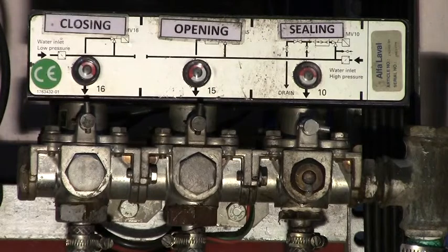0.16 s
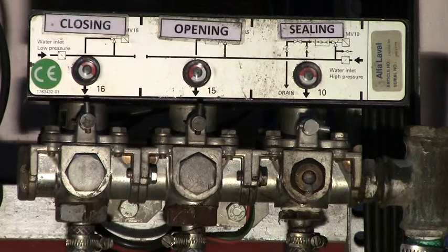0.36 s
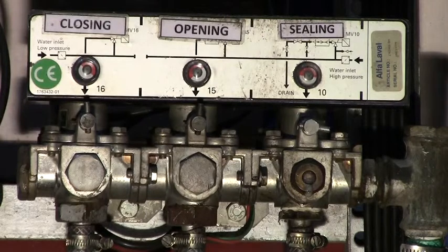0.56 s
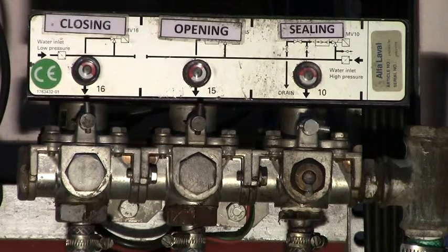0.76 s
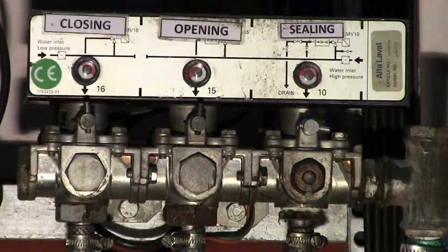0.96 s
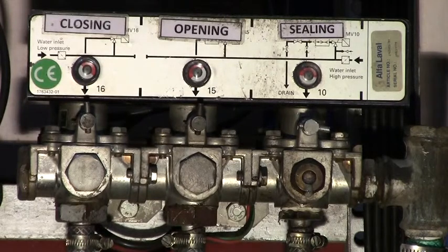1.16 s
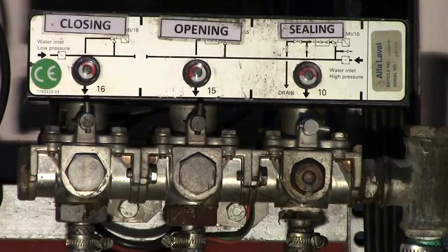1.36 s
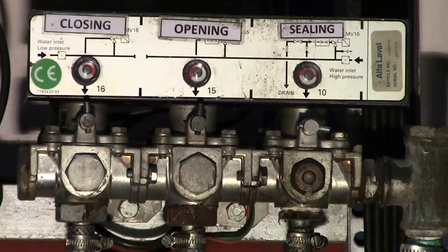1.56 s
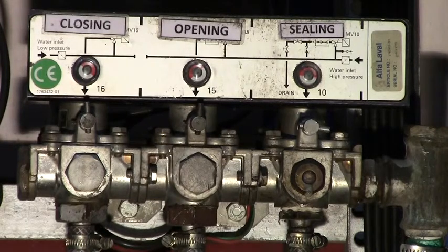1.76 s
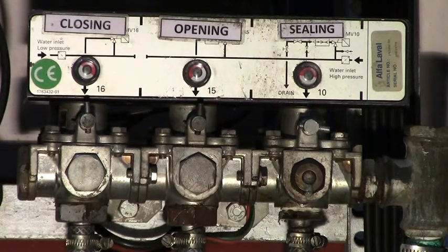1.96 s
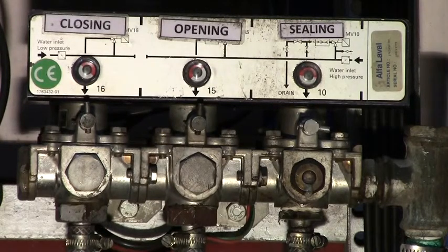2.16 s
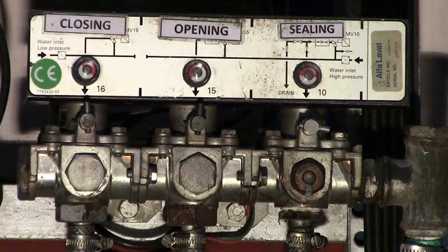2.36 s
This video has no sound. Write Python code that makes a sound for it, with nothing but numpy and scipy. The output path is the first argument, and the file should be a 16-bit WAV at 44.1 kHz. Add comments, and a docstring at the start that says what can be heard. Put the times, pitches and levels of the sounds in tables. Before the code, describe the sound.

An industrial centrifugal separator drones loudly and steadily up close, with rushing air and metallic ringing

```python
"""Industrial centrifugal separator

A separator runs at constant speed, heard close up in a workshop.
The spinning bowl drones on multiples of its turning rate; the slower drive motor adds weaker lines.
Air dragged round the bowl rushes and keeps the steel housing ringing, with a fine hiss on top.
Beneath lies a wide low rumble that swells, then drops away around the first second.
"""
import sys
import numpy as np
from scipy import signal
from scipy.fft import irfft
from scipy.io import wavfile

SR = 44100
rng = np.random.default_rng(int(sys.argv[2]) if len(sys.argv) > 2 else 0)


def unload_audio(sound):
    """Save the sound as a 16-bit wav file, at the path given as the first command line argument."""
    columns = np.transpose(np.atleast_2d(sound))
    # keep every value between -1 and 1, then stretch to whole-number steps
    steps = np.round(np.clip(columns, -1, 1) * 32767)
    wavfile.write(sys.argv[1], SR, steps.astype(np.int16))


N = 110691
TIME, FREQS = np.arange(N) / SR, np.fft.rfftfreq(N, 1 / SR)

# tones of the bowl: multiple of its turning rate, level/dB
BOWL_TONES = [(1, -28.5), (2, -38), (3, -31), (4, -42.5), (5, -30), (6, -38.5), (7, -26.0), (8, -43.5),
              (9, -40.5), (10, -33), (11, -26.5), (12, -26.8), (13, -32.5), (14, -31), (15, -44), (16, -36),
              (17, -38), (18, -31.5), (19, -45), (20, -39), (21, -42.5), (22, -38), (23, -39), (24, -42),
              (26, -38), (27, -43), (29, -48), (32, -45), (33, -43), (34, -48)]
# tones of the motor: multiple of its turning rate, level/dB
MOTOR_TONES = [(10, -39.5), (12, -34.5), (15, -39.6), (16, -43.5), (24, -37), (27, -40.5), (28, -45),
               (30, -45), (31, -45.5), (34, -42.3), (37, -38.5)]
# tones that follow neither shaft, probably bearings: f/Hz, level/dB
BEARING_TONES = [(346.9, -39.4), (769.4, -38.5)]
# resonances of the housing: f/Hz, half-power width/Hz, peak level/(dB per Hz)
HOUSING_MODES = [(214.5, 8, -53), (243, 28, -52), (283, 12, -61), (364, 53, -60.5), (517, 30, -56),
                 (621, 15, -54.5), (686, 31, -53.5), (770, 21, -48), (865, 26, -54), (870, 15, -62.5),
                 (1054, 39, -54.1), (1135, 26, -49.5), (1248, 23, -45), (1312, 27, -51), (1360, 65, -53.0),
                 (1464, 36, -49.5), (1532, 18, -49.0), (1608, 41, -47), (1665, 88, -54.5),
                 (1754, 21, -51.4), (1813, 27, -48.6), (1892, 43, -45.5), (1964, 29, -51),
                 (2038, 35, -54.5), (2150, 61, -50.5), (2222, 21, -51), (2310, 77, -54.5),
                 (2497, 72, -51.5), (2607, 26, -51), (2667, 62, -54), (2820, 98, -52.4), (2917, 55, -51),
                 (3070, 39, -46.5), (3129, 38, -55), (3220, 35, -53.9), (3334, 107, -51.5), (3660, 50, -61),
                 (3785, 61, -59), (3970, 66, -61.2), (6470, 57, -58.5), (7660, 215, -60), (7830, 57, -63),
                 (8280, 145, -59.4)]
# rush and hiss of air: f/Hz, level/(dB per Hz)
RUSH_SPECTRUM = [(20, -72), (45, -64.6), (75, -57), (130, -60.9), (185, -62), (240, -57), (450, -57.5),
                 (1000, -56.5), (2000, -69.5), (3000, -58.7), (4000, -56.5), (4500, -62.2), (6000, -60.5),
                 (8000, -62.5), (9500, -64.5), (12000, -68.5), (15700, -70.8)]
# part of the air noise that differs between the two sides: f/Hz, level/(dB per Hz)
SIDE_SPECTRUM = [(25, -82), (130, -80), (320, -81), (700, -75), (1000, -96), (1400, -115), (3900, -110),
                 (4600, -92), (7000, -88), (8000, -75), (10000, -75), (13000, -77.5), (15700, -83)]
# low rumble before its level curve: f/Hz, level/(dB per Hz)
RUMBLE_SPECTRUM = [(20, -66), (75, -57), (140, -61), (250, -69), (450, -80), (900, -110), (2000, -140)]
# level curve of the rumble: t/s, level/dB
RUMBLE_CURVE = [(0, -2), (.2, 1), (.55, -4), (.7, 5), (.85, -2), (1.05, -13), (2.5, -18)]

BOWL_HZ, MOTOR_HZ = 113.3, 24.203  # turning rates
WANDER_TURNS, WANDER_HZ = 0.00098, 3.5  # tiny wander of the shaft angle, and its top rate
WAVER, WAVER_HZ = 0.075, 3.99  # share by which each tone wavers, and its top rate
FLUTTER_DB, FLUTTER_HZ, FLUTTER_ABOVE_HZ = 0.4, 18, 2000  # treble flutter: depth, top rate, crossover
RIPPLE_DB, RIPPLE_HZ, RIPPLE_FULL_HZ = 1.5, 32, 4500  # fine ripple of the treble: depth, spacing, full from
LEAN_DB, LEAN_ABOVE_HZ = 2.1, 9300  # the top of the hiss leans to the left
EDGE_HZ = 15780  # upper band limit


def scene():
    """The machine's tones stand in the centre of the rushing air and the wide rumble."""
    bowl = shaft(BOWL_HZ, BOWL_TONES)
    motor = shaft(MOTOR_HZ, MOTOR_TONES)
    return bowl + motor + bearings() + air() + rumble()


def shaft(hz, tones):
    """A turning shaft sounds on whole multiples of its rate, all sharing one wander of its angle."""
    turns = hz * TIME + WANDER_TURNS * drift(WANDER_HZ)
    return sum(tone(round(multiple) * turns, db) for multiple, db in tones)


def bearings():
    """Two tones that follow neither shaft, each at its own fixed pitch."""
    return sum(tone(hz * TIME, db) for hz, db in BEARING_TONES)


def tone(turns, db):
    """One steady line, wavering a little in level and phase."""
    angle = 2 * np.pi * (turns + rng.random())
    in_phase = (1 + WAVER * drift(WAVER_HZ)) * np.cos(angle)
    quadrature = WAVER * drift(WAVER_HZ) * np.sin(angle)
    return np.sqrt(2) * amp(db) * (in_phase + quadrature)  # root 2: levels are RMS


def air():
    """Turbulence, heard directly and through the ringing housing; its treble spreads and flutters."""
    rush_power = amp(read(RUSH_SPECTRUM, FREQS)) ** 2
    colour = np.sqrt(housing_power() + rush_power)
    mid = white() * colour * ripple()
    side = white() * amp(read(SIDE_SPECTRUM, FREQS))

    # half the lean lifts the left, half lowers the right
    lean_rise = 1 - 1 / (1 + (FREQS / LEAN_ABOVE_HZ) ** 10)
    lean = amp(LEAN_DB / 2 * lean_rise)
    pair = np.array([(mid + side) * lean, (mid - side) / lean])

    treble_share = FREQS ** 2 / (FREQS ** 2 + FLUTTER_ABOVE_HZ ** 2)
    body = irfft(pair * (1 - treble_share), N)
    treble = irfft(pair * treble_share, N)
    return body + treble * amp(FLUTTER_DB * drift(FLUTTER_HZ))


def housing_power():
    """Each resonance of the steel housing is a rounded peak in the power spectrum of the air noise."""
    power = 0
    for hz, width, db in HOUSING_MODES:
        offset = 2 * (FREQS - hz) / width  # 1 at the half-power point
        power = power + amp(db) ** 2 / (1 + (np.sqrt(2) - 1) * offset ** 2) ** 2
    return power


def ripple(count=2048):
    """Close reflections colour the hiss with a fine, fixed random ripple."""
    bumps = np.interp(FREQS / RIPPLE_HZ, np.arange(count), rng.standard_normal(count))
    fade_in = np.clip(2 * FREQS / RIPPLE_FULL_HZ - 1, 0, 1)  # starts at half the full frequency
    return amp(RIPPLE_DB * bumps * fade_in)


def rumble():
    """Low noise of opposite polarity on the two sides, so wide; it swells, then drops away."""
    level = amp(np.interp(TIME, *np.transpose(RUMBLE_CURVE)))
    low = irfft(white() * amp(read(RUMBLE_SPECTRUM, FREQS)), N) * level
    return np.array([low, -low])


def white():
    """Random-phase spectrum of noise at 0 dB per Hz."""
    return np.exp(2j * np.pi * rng.random(len(FREQS))) * np.sqrt(N * SR / 2)


def drift(top_hz, count=24):
    """Random motion of unit RMS size: a sum of sines with rates spread up to a top rate."""
    rates = top_hz * (np.arange(count) + rng.random(count)) / count
    coarse = np.linspace(0, N / SR, 512)  # sparse times suffice for slow motion
    waves = np.sin(2 * np.pi * (rates[:, None] * coarse + rng.random((count, 1))))
    return np.interp(TIME, coarse, waves.sum(0) * np.sqrt(2 / count))


def read(points, hz):
    """Reads a spectrum table along a log-frequency axis."""
    f, value = np.transpose(points)
    return np.interp(np.log(hz + 1), np.log(f + 1), value)


def amp(db):
    """Decibels to gain."""
    return 10 ** (np.asarray(db) / 20)


def record(dry):
    """A steep linear-phase low-pass limits the band at the top."""
    lowpass = signal.firwin(1023, EDGE_HZ, window=("kaiser", 9), fs=SR)
    return signal.oaconvolve(dry, lowpass[None], "same")


dry = scene()
out = record(dry)
unload_audio(out)
```